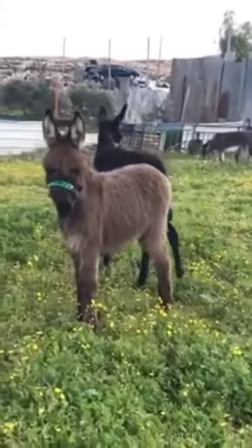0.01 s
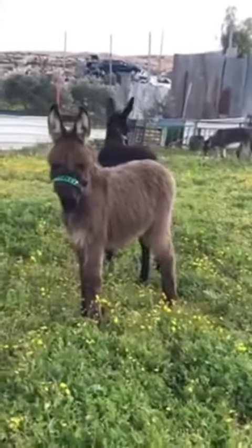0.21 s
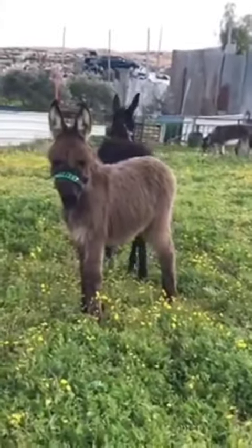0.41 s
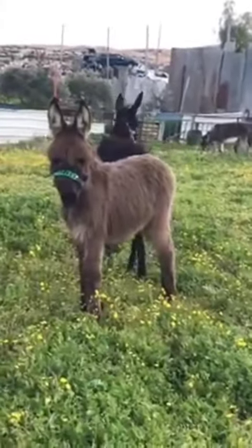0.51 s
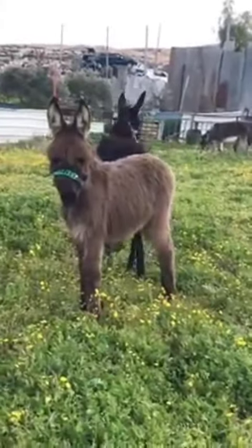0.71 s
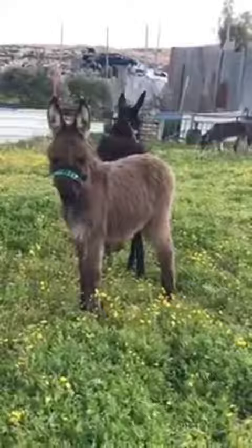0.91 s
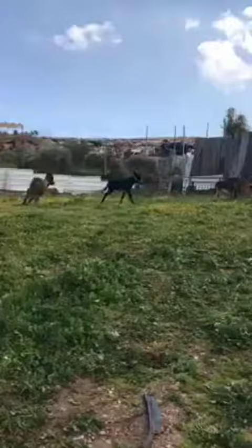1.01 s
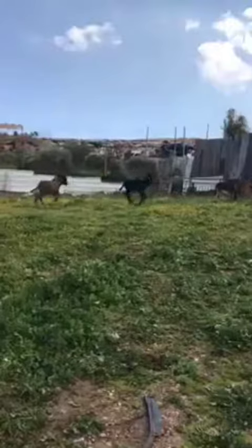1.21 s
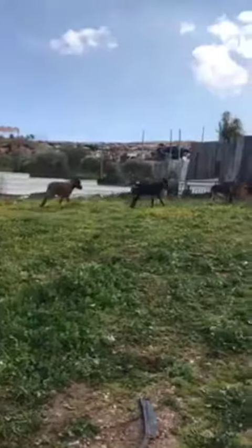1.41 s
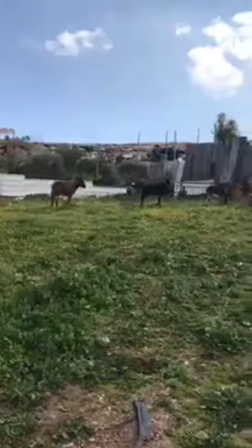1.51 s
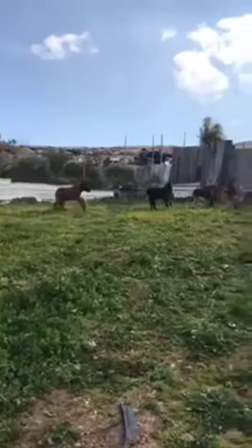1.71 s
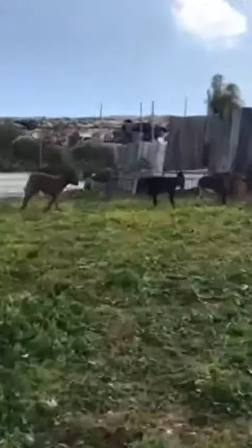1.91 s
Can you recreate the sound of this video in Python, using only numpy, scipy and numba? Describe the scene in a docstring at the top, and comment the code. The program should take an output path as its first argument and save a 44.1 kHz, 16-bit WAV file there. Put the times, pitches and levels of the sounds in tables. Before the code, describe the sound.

A donkey brays close to the microphone in an open field: a slow rattle speeds up into a honk and a hoarse squeal, then cuts off. After a brief silence, soft bumps and a faint distant bray come over low rumble.

```python
"""A thin far call and a soft bump sound over the low rumble of an open field. A near donkey starts a bray:
slow pulses of its vocal folds ring chest, throat and muzzle in a rattle, which speeds up, breaks into
a honk and ends in a hoarse squeal. At 0.66 s the sound breaks off into silence. At 1.25 s the field
returns with a few bumps, and the far call, probably another bray, wavers in two tones over the rumble."""
import sys
import numpy as np
from scipy import signal
from scipy.fft import rfft, irfft
from scipy.io import wavfile
from numba import njit

SR = 44100
rng = np.random.default_rng(int(sys.argv[2]) if len(sys.argv) > 2 else 0)


def dump(signal):
    """Clip the signal to [-1, 1] and save it as 16-bit WAV at the path in sys.argv[1]."""
    limited = np.clip(np.atleast_2d(signal).T, -1, 1)
    pcm = np.round(limited * 32767).astype(np.int16)
    wavfile.write(sys.argv[1], SR, pcm)


N = 88200
T = np.arange(N) / SR
HZ = np.fft.rfftfreq(N, 1 / SR)


def amp(db):
    """Amplitude ratio of a level in decibels."""
    return 10 ** (np.asarray(db) / 20)


def unit_rms(x):
    """Normalisation to unit mean power."""
    return x / np.sqrt(np.mean(x ** 2) + 1e-20)


def curves(table):
    """Linear interpolation of each column of a timed table, sample by sample."""
    times, *columns = np.transpose(table)
    return [np.interp(T, times, column) for column in columns]


def during(table, fade_s=.01):
    """Trapezoidal window: 1 while a timed table lasts, with linear fades outside."""
    return np.clip(np.minimum(T - table[0][0], table[-1][0] - T) / fade_s + 1, 0, 1)


def noise(gain):
    """Spectral shaping: noise of rms 1 with the given relative gain at each frequency."""
    return unit_rms(irfft(rfft(rng.standard_normal(N)) * gain, N))


def wander(rate_hz):
    """Random fluctuation of rms 1: noise low-passed at rate_hz."""
    return noise(1 / (1 + (HZ / rate_hz) ** 4))


def blend(clean, rough, share):
    """Power-law crossfade: the squares of the two weights sum to 1."""
    share = np.clip(share, 0, 1)
    return np.sqrt(1 - share ** 2) * clean + share * rough


@njit
def smooth(z, pole):
    """First-order low-pass with a time-varying pole."""
    out, last = np.empty_like(z), 0j
    for i in range(len(z)):
        last = pole[i] * last + (1 - pole[i]) * z[i]
        out[i] = last
    return out


def resonate(x, hz, width_hz):
    """Tunable double-pole resonance; it passes the same noise power at any width."""
    carrier = np.exp(2j * np.pi * np.cumsum(hz * np.ones(N)) / SR)
    pole = np.exp(-np.pi * width_hz * np.ones(N) / SR)
    baseband = smooth(smooth(x / carrier, pole), pole)
    return (carrier * baseband).real * np.sqrt(4 * SR / (np.pi * width_hz))


def wavering_phase(hz, waver, waver_hz):
    """Random frequency modulation; waver is the rms deviation as a fraction of hz."""
    return 2 * np.pi * np.cumsum(hz * (1 + waver * wander(waver_hz))) / SR


def whistle(table, waver, waver_hz, flutter_db, octave_db):
    """A squeezed tone with a weak second harmonic, randomly modulated in frequency and level."""
    hz, db = curves(table)
    phase = wavering_phase(hz, waver, waver_hz)
    tone = np.sin(phase) + amp(octave_db) * np.sin(2 * phase)
    return during(table) * amp(db + flutter_db * wander(waver_hz)) * unit_rms(tone)


def field():
    """Ambient noise: the broadband hush of open air, a narrow-band rumble and bumps share one envelope."""
    # spectral density of the hush: f/Hz, relative level/dB
    air_spectrum = [(20, -28), (70, 0.5), (130, -3.5), (270, -2.5), (430, -9), (750, -8.5), (1100, -12),
                    (1600, -18.5), (2200, -28.5), (3200, -31), (4500, -35), (7000, -37.5), (8200, -47),
                    (9500, -40.5), (11700, -47), (12500, -53), (15500, -56.5)]
    # envelope of the background: t/s, gain/dB
    envelope = [(0, 0), (.2, -1.5), (.55, 5.5), (.66, -12), (1.247, 0), (1.297, -2.5), (1.302, -22),
                (1.318, -6.5), (1.345, -0.5), (1.6, 1.5), (2, 0)]
    hz, db = np.transpose(air_spectrum)
    air = noise(amp(np.interp(np.log(HZ + 1), np.log(hz + 1), db)))
    rumble = unit_rms(resonate(rng.standard_normal(N), hz=63.2, width_hz=43))
    return amp(curves(envelope)[0]) * (amp(-55) * air + amp(-49.5) * rumble + bumps())


def far_call():
    """Superposition of gliding tones: one opening note, later a low and a high tone with squeaks."""
    # opening note: t/s, f/Hz, level/dB
    opening = [(0, 641.7, -55), (.045, 652.6, -52.5), (.075, 673.6, -70), (.1, 637.7, -53.5),
               (.17, 646, -66), (.22, 691, -87)]
    # low tone: t/s, f/Hz, level/dB
    low_tone = [(1.332, 686.7, -65), (1.348, 706.3, -52.5), (1.38, 730.7, -53), (1.4, 823.4, -56),
                (1.445, 821.5, -55), (1.465, 777, -56), (1.5, 780, -75), (1.585, 758, -63),
                (1.61, 904, -56.5), (1.635, 966.6, -59), (1.665, 905, -56.5), (1.69, 761, -49),
                (1.702, 752, -74), (1.717, 844.6, -51.5), (1.78, 911, -58), (1.87, 913, -57.5),
                (1.965, 899, -55), (2, 859, -58)]
    # high tone: t/s, f/Hz, level/dB
    high_tone = [(1.39, 1660, -79), (1.435, 1650, -66), (1.46, 1665, -61), (1.52, 1650, -63),
                 (1.58, 1660, -77), (1.605, 1862, -73), (1.63, 1890, -67.5), (1.69, 1900, -59.5),
                 (1.735, 1780, -63), (1.78, 1780, -58.5), (1.8, 1770, -75), (1.825, 1800, -56.5),
                 (1.87, 1880, -64), (1.93, 1790, -59.5), (2, 1775, -58.5)]
    call = whistle(opening, waver=.0091, waver_hz=79, flutter_db=3, octave_db=-12) + squeaks()
    call += whistle(low_tone, waver=.02066, waver_hz=130, flutter_db=2, octave_db=-18)
    call += whistle(high_tone, waver=.01858, waver_hz=146.7, flutter_db=2.5, octave_db=-29)
    return call


def echo(x, db, t60_s):
    """Scattering from ground and fences adds an exponentially decaying tail after 4 ms."""
    t = np.arange(SR // 3) / SR
    tail = rng.standard_normal(len(t)) * amp(-60 * t / t60_s) * (t > .004)
    return x + amp(db) * signal.fftconvolve(x, tail / np.linalg.norm(tail))[:N]


def bumps():
    """Damped noise bands: each dull knock decays over the same number of cycles, so low ones last longer."""
    # soft bumps close by: onset t/s, f/Hz, level/dB
    knocks = [(.075, 178.6, -46), (1.248, 162, -46), (1.29, 732, -43.5), (1.346, 153, -50)]
    rise_s, decay_cycles = .0031, 7.6
    out = np.zeros(N)
    for start, hz, db in knocks:
        age = np.maximum(T - start, 0)
        ring = unit_rms(resonate(rng.standard_normal(N), hz, width_hz=hz / 2))
        out += amp(db) * ring * np.minimum(age / rise_s, 1) * np.exp(-age * hz / decay_cycles)
    return out


def vocal_folds():
    """Glottal source: each closure gives a pulse and a puff of air, with jitter and shimmer."""
    # vibration of the folds: t/s, pulse rate f/Hz, roughness (0-1)
    vibration = [(.14, 85, .3), (.2, 50.5, 0.7), (.235, 45.4, 0.8), (.285, 41.5, 0.4), (.315, 60, 0.15),
                 (.37, 63, .12), (.4, 82, .2), (.45, 96.5, 0.4), (.468, 112, 0.3), (.482, 160, 0.4),
                 (.51, 172, 0.4), (.55, 186, .38), (.565, 350, .75), (.66, 405, .75)]
    closure_s = .3305  # the folds close at this moment; the other pulses follow from their rate
    jitter, shimmer_db = .056, 1.22  # jitter is the rms fraction of the rate at roughness 1
    puff_floor, puff_decay_cycles, fundamental_lag_s = .22, .22, .004
    rate, roughness = curves(vibration)
    turns = np.cumsum(rate * (1 + jitter * roughness * wander(rate_hz=120))) / SR
    turns -= np.interp(closure_s, T, turns)
    cycle = np.floor(turns).astype(int)
    strength = amp(shimmer_db * rng.standard_normal(N)[cycle])
    pulses = -np.diff(cycle, prepend=cycle[0]) * np.sqrt(SR / rate) * strength
    airflow = puff_floor + np.exp(-(turns % 1) / puff_decay_cycles)
    puffs = unit_rms(airflow * strength * rng.standard_normal(N))
    fundamental = np.sqrt(2) * np.cos(2 * np.pi * (turns - rate * fundamental_lag_s))
    return fundamental, blend(pulses, puffs, roughness), puffs


def bray():
    """Source-filter principle: fold pulses and puffs of air excite chest, throat and muzzle in parallel."""
    # effort of the bray: t/s, then level/dB of fundamental, chest, throat, upper formants, treble rasp
    effort = [(.12, -53, -71.5, -93, -109, -93), (.19, -42, -46.5, -68, -70, -85),
              (.24, -36.5, -53.5, -56, -57.5, -65.5), (.303, -42.5, -44, -55, -54, -78),
              (.33, -38, -33.5, -40.5, -50, -76), (.378, -39.5, -37, -41.5, -61.5, -69.5),
              (.396, -37.5, -41, -36.5, -54, -62.5), (.46, -35, -34, -37.5, -49.5, -61),
              (.48, -39, -40.5, -24, -47.5, -51), (.51, -34.5, -36, -26, -45, -47),
              (.54, -51.5, -48.5, -25, -44, -45), (.562, -47, -49.5, -31, -48, -48),
              (.6, -50, -49, -37, -43.5, -45.5), (.66, -62, -50.5, -36, -50, -46)]
    # upper formants of the muzzle: f/Hz, width/Hz, relative level/dB
    upper_formants = [(1520, 190, 1.5), (2068, 130, -3.5)]
    # treble formants of the muzzle: f/Hz, width/Hz, relative level/dB
    treble_formants = [(2499, 85, 0.5), (3060, 240, -2), (3480, 150, -3), (3960, 260, -3.5),
                       (4506, 150, -7), (5200, 290, -14), (5620, 320, -18), (6137, 310, -31.5),
                       (8560, 750, -35.5)]
    fundamental_db, chest_db, throat_db, upper_db, treble_db = curves(effort)
    fundamental, drive, puffs = vocal_folds()
    voice = amp(fundamental_db) * fundamental
    voice += amp(chest_db) * resonate(drive, hz=152.8, width_hz=50)
    voice += amp(throat_db) * throat(drive)
    voice += amp(upper_db) * muzzle(blend(drive, puffs, share=.6), upper_formants)
    voice += amp(treble_db) * muzzle(blend(drive, puffs, share=.85), treble_formants)
    return during(effort) * voice


def throat(drive):
    """Cavity resonance: two formants shift as the mouth opens, while that of the cheeks stays put."""
    # main throat resonance as the mouth opens: t/s, f/Hz, width/Hz
    mouth_formant = [(.3, 519, 170), (.44, 548, 190), (.475, 650, 140), (.51, 703.4, 150),
                     (.55, 782.5, 180), (.57, 787, 500), (.66, 680, 560)]
    mouth_hz, mouth_width_hz = curves(mouth_formant)
    mouth = resonate(drive, mouth_hz, mouth_width_hz)
    pharynx = amp(-6.5) * resonate(drive, .784 * mouth_hz, width_hz=170)
    cheeks = amp(-14.5) * resonate(drive, hz=1006, width_hz=170)
    return mouth + pharynx + cheeks


def muzzle(x, formants):
    """Stationary resonances in parallel, their sum scaled to rms 1."""
    return unit_rms(sum(amp(db) * resonate(x, hz, width) for hz, width, db in formants))


def nose(x, cutoff_hz=9500):
    """Side-branch antiresonance cuts valleys in the spectrum; absorption in soft tissue dulls the top."""
    # antiresonances of the nasal side passages: f/Hz, width/Hz
    notches = [(2730, 340), (3330, 97), (3740, 65), (4260, 87), (4900, 900)]
    for hz, width in notches:
        x = signal.lfilter(*signal.iirnotch(hz, hz / width, fs=SR), x)
    return signal.sosfilt(signal.butter(6, cutoff_hz, fs=SR, output="sos"), x)


def squeal():
    """Rapid random modulation makes the rising tone at the end of the bray hoarse."""
    # course of the squeal: t/s, f/Hz, level/dB
    glide = [(.558, 1368, -50.5), (.572, 1403, -34.5), (.595, 1435, -38.5), (.612, 1487, -42.5),
             (.63, 1490, -40), (.66, 1526, -53)]
    return whistle(glide, waver=.015, waver_hz=160, flutter_db=1.5, octave_db=-22)


def squeaks():
    """Brief frequency-modulated side tones of the far call, each under a half-sine envelope."""
    # squeaks where the far call breaks: onset t/s, duration/s, f/Hz, level/dB
    side_tones = [(1.375, 0.091, 2480, -73), (1.405, 0.064, 1450, -62.5), (1.609, 0.1, 2836, -77),
                  (1.701, 0.11, 3530, -73.5), (1.851, 0.033, 1945, -61), (1.896, 0.0093, 2110, -60.5),
                  (1.897, .1, 3215, -77), (1.96, 0.06, 3530, -78)]
    out = np.zeros(N)
    for start, length, hz, db in side_tones:
        swell = np.sin(np.pi * np.clip((T - start) / length, 0, 1))
        tone = np.sin(wavering_phase(hz, waver=.0121, waver_hz=150))
        out += amp(db) * swell * unit_rms(tone)
    return out


def scene():
    """Superposition of the near donkey and the far call, each with its echo, and the field."""
    near = nose(bray()) + squeal()
    far = far_call()
    return (echo(near, db=-17, t60_s=.15) + echo(far, db=-11.5, t60_s=.14) + field())[None]


def record(dry):
    """Band limiting and gating: the deepest bass and top treble go; the sound breaks off and resumes."""
    low_edge_hz, high_edge_hz = 32, 15700
    break_s, resume_s = .6583, 1.2465
    drop_db, drop_s, t60_s = -3, .0019, .033  # a quick drop, then exponential decay
    dry = signal.sosfilt(signal.butter(4, low_edge_hz, "highpass", fs=SR, output="sos"), dry)
    since_break = np.maximum(T - break_s, 0) * (T < resume_s)
    gate = amp(drop_db * np.minimum(since_break / drop_s, 1) - 60 * since_break / t60_s)
    low_pass = signal.firwin(255, high_edge_hz, window=("kaiser", 8), fs=SR)
    return signal.oaconvolve(dry * gate, low_pass[None], "same")


dry = scene()
out = record(dry)
dump(out)
```